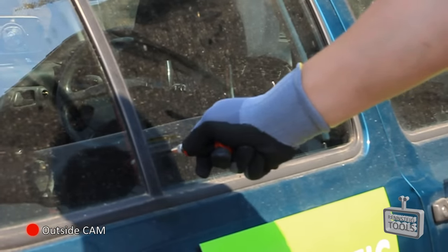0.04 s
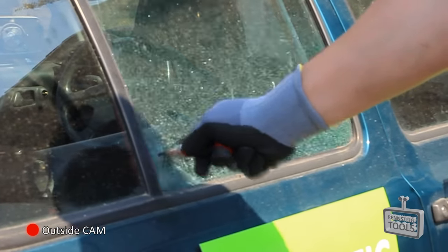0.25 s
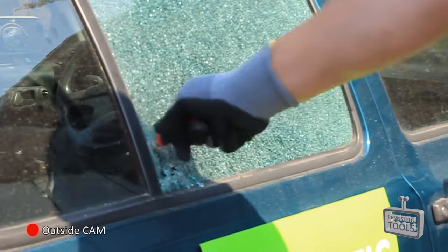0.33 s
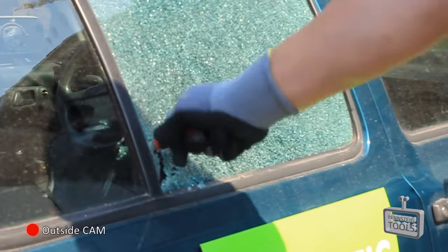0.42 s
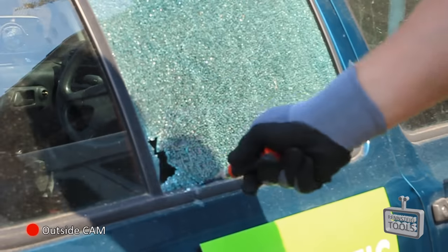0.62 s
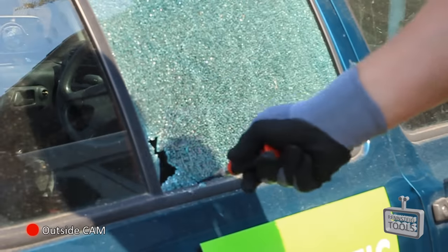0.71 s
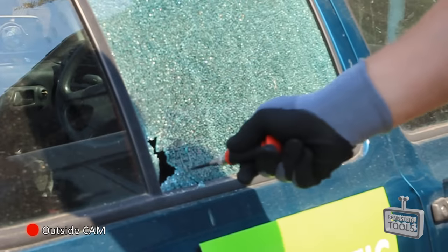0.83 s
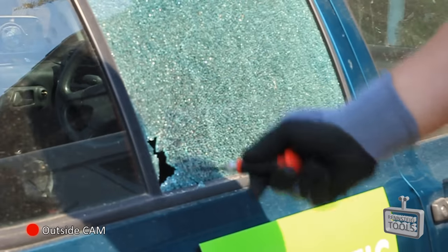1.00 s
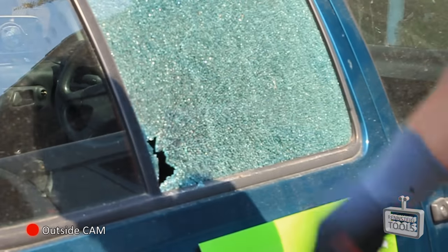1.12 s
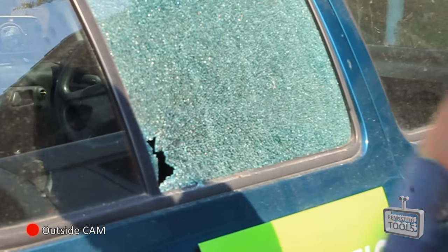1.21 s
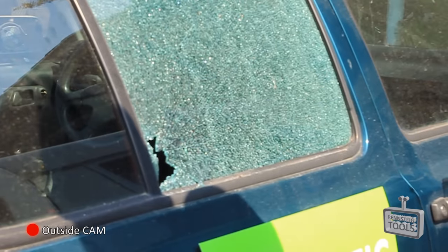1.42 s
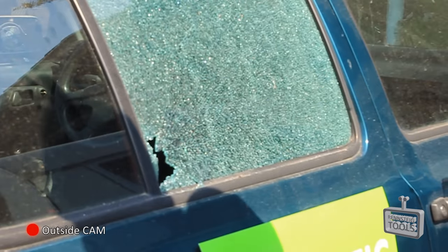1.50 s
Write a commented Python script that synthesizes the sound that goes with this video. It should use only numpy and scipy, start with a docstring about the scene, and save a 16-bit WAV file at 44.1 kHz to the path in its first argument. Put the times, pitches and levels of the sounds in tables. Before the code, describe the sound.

A car side window shatters, heard close up in quiet outdoor air. At about 0.2 seconds a punch tool gives one sharp crack with a light thump. Dense, fizzing crackle spreads through the glass, dotted with snaps, strongest from 0.3 to 0.8 seconds, then thinning. From 0.9 seconds loose pieces drop into the door with small hollow knocks and clinks, loudest around 1.2 and fading by 1.5 seconds.

```python
"""Outdoors, close to a car's side window, a spring punch is pressed against the glass and fires. The impact
gives one crack and a thump from the pane's modes. Fracture then spreads through the tempered glass as a dense
crackle that thins to single snaps. Loose pieces drop into the door and excite its brief ring, and glass edges
squeak once. The car's interior reverberates faintly over quiet outdoor air."""
import sys
import numpy as np
from scipy import signal
from scipy.fft import rfft, irfft, next_fast_len
from scipy.io import wavfile
from scipy.ndimage import uniform_filter1d

SR = 44100
rng = np.random.default_rng(int(sys.argv[2]) if len(sys.argv) > 2 else 0)


def transcribe(signal):
    """Save signal, clipped to [-1, 1], as a 16-bit WAV file at the path in sys.argv[1]."""
    frames = np.atleast_2d(signal).T
    limited = np.clip(frames, -1, 1)
    pcm = np.round(limited * 32767).astype(np.int16)
    wavfile.write(sys.argv[1], SR, pcm)


N = 68355

# blows of the punch: t/s, crack level/dB, thump level/dB, crack t60/s
PUNCH = [(0.2292, -4.5, -18, 0.015), (0.2294, -2, -19, 0.016), (0.2341, -14, -22, 0.0088)]
# spectrum of a snap's bright edge: f/Hz, level/dB
EDGE = [(1500, -17.5), (3500, -3), (6500, -1.5), (10000, -6.5), (15500, -5.5)]
# spectrum of its duller body: f/Hz, level/dB
BODY = [(100, -42), (250, -15), (800, -3), (2000, -0.5), (3700, -1.5), (10000, -42)]
# modes of the door: f/Hz, level/dB, t60/s
DOOR = [(450, -3, 0.06), (808, 0, 0.078), (920.4, 4.5, 0.061), (1159, 3, 0.049), (1330, 0.5, 0.07),
        (1450, -5.5, 0.11), (1774, 1, 0.065), (1916, -3, 0.1), (2182, -4, 0.095)]
SNAP_T60_S, TOP_HZ = 0.046, 15700


def punch(press_s=0.19):
    """Impact excitation: the tip grinds ever harder, fires, and sets the pane's modes ringing."""
    # spectra of the crack, the thump and the flexing pane: f/Hz, level/dB
    crack = [(200, -12), (1100, 1.5), (2000, -3.5), (4000, -6.5), (9500, -6), (16000, -11)]
    thump = [(120, -18), (225, 12), (500, -5), (850, 1), (1500, -10.5), (4000, -36)]
    flex = [(60, -24), (160, -10), (280, -3.5), (420, -11), (4000, -30.5), (6500, -54)]
    # modes of pane and steel tip: f/Hz, level/dB, t60/s
    pane_modes = [(227, -16.5, 0.078), (283, -27, 0.21), (810, -12, 0.046), (963, -17, 0.046),
                  (2240, -10.5, 0.025), (4160, -4.5, 0.015), (7110, -10, 0.016), (9480, -5, 0.014)]
    fire_s = PUNCH[0][0]
    force = curve([(press_s, 0), (fire_s, 1)])
    contact = curve([(press_s, 0), (press_s + 0.0032, 1), (fire_s, 1), (PUNCH[-1][0], 0)])
    out = noise(flex) * amp(-37 + 10.5 * force) * contact
    for s, crack_db, thump_db, t60 in PUNCH:
        add(out, s, amp(crack_db) * burst(crack, rise=0.0001, t60=t60))
        add(out, s, amp(thump_db) * burst(thump, rise=0.00034, t60=0.056))
    add(out, fire_s, amp(-28) * burst(flex, rise=0, t60=0.32))  # pane and door shudder
    add(out, fire_s, ring(pane_modes, rise=0.00066))
    return out


def crazing(dense_per_s=2600, sparse_per_s=100, spread_db=6.5, clump_db=1.8, ring_s=0.0059, ring_db=4):
    """Shot noise: tiny cracks, each with a short ring, cross the pane, growing coarser, then fewer."""
    # envelope of the crackle: t/s, level/dB
    envelope = [(.228, -88), (.24, -39.5), (.312, -38.5), (.33, -31.5), (.51, -30.5), (.7, -28),
                (.77, -35.5), (.85, -42), (.95, -41), (1.05, -52.5), (1.17, -58), (1.26, -43.5),
                (1.38, -56)]
    # spectra of early hairline cracks and of later, wider ones: f/Hz, level/dB
    fine = [(60, -27), (200, -5.5), (1000, -4.5), (2200, -2), (4500, -7), (6500, -2.5), (9500, -10.5)]
    coarse = [(100, -50), (280, -7), (650, -6.5), (1000, 0), (2000, -3), (4000, -7), (8000, -15)]
    level = amp(curve(envelope))
    rate = sparse_per_s + dense_per_s * level / level.max()
    sizes = amp(spread_db * np.minimum(rng.exponential(size=N), np.pi)) * rng.choice([-1, 1], N)
    impulses = unit((rng.random(N) < rate / SR) * sizes / np.sqrt(rate))
    ringing = unit(np.sqrt(decay(impulses ** 2, ring_s)) * rng.standard_normal(N))
    clumps = amp(clump_db * unit(uniform_filter1d(rng.standard_normal(N), size=260)))
    cracks = unit(impulses + amp(ring_db) * ringing) * level * clumps
    late = curve([(0.37, 0), (0.8, 1)])
    mix = (1 - late) * unit(coloured(cracks, fine)) + late * unit(coloured(cracks, coarse))
    return unit(mix) * np.sqrt(np.mean(level ** 2))


def snaps(tick_t60_s=0.0033):
    """Acoustic emission: a larger crack gives a tick, a bright edge and a dull pane and door response."""
    # larger cracks: t/s, edge level/dB, body level/dB
    fractures = [(0.327, -28, -36), (.341, -23, -27.5), (.361, -31, -47), (.483, -20.5, -24.5),
                 (.4912, -27, -28), (0.5434, -21.5, -33), (0.549, -20, -39), (0.5703, -20.5, -22),
                 (0.605, -23.5, -22.5), (.646, -36, -23), (0.6621, -19.5, -19), (0.668, -26.5, -18.5),
                 (.688, -22.5, -18.5), (.699, -28, -23), (0.7319, -25, -21.5), (0.7906, -22.5, -17),
                 (.797, -36, -24), (0.867, -26, -33), (0.9842, -30, -35.5), (1.0275, -40, -45),
                 (1.139, -38.5, -51), (1.301, -29, -39), (1.377, -43.5, -49.5), (1.4652, -48.5, -38)]
    # single splinters giving way: t/s, level/dB
    ticks = [(0.9128, -29), (.962, -36), (1.070, -34)]
    out = np.zeros(N)
    for s, edge_db, body_db in fractures:
        edge = burst(EDGE, rise=0.00029, t60=SNAP_T60_S)
        tick = amp(2) * burst(EDGE, rise=0, t60=tick_t60_s)
        body = burst(BODY, rise=0.0013, t60=1.17 * SNAP_T60_S)
        door = amp(-16) * ring(DOOR, rise=0)
        add(out, s, amp(edge_db) * (edge + tick) + amp(body_db) * (body + door))
    for s, db in ticks:
        add(out, s, amp(db) * burst(EDGE, rise=0, t60=2 * tick_t60_s))
    return out


def loose_pieces():
    """Struck resonator: loose glass clinks, knocks and thuds in the door; soft landings are duller. Once,
    rubbing glass edges give a bright squeak."""
    # contacts: landings of loose pieces and, at 0.97 s, a squeak of rubbing glass edges: t/s, knock level/dB,
    # clink level/dB, thud level/dB, rise/s, t60/s, cutoff f/Hz
    contacts = [(0.9124, -28, -48, -45, 0.0014, 0.25, 6000), (0.97, -33.5, -19, -47, .0012, 0.066, 7500),
                (1.101, -20.5, -38, -41.5, 0.0027, 0.047, 1270),
                (1.184, -12.5, -19, -24.5, 0.0026, 0.089, 15500),
                (1.214, -12.5, -25, -35.5, 0.0076, 0.086, 7960),
                (1.2239, -21.5, -13.5, -38, 0.00063, 0.08, 14500),
                (1.273, -8.5, -25, -43.5, 0.00066, 0.048, 15500),
                (1.381, -27.5, -54, -56, 0.014, 0.13, 2600), (1.476, -30, -48, -59.5, 0.002, 0.062, 3320)]
    # spectrum of the hollow knock: f/Hz, level/dB
    hollow = [(150, -37), (400, -10.5), (870, -0.5), (2100, -4.5), (3000, -13.5), (4200, -18.5),
              (7000, -33)]
    # low mode of the door skin: f/Hz, level/dB, t60/s
    skin_mode = [(306.3, -0.5, 0.18)]
    out = np.zeros(N)
    for s, knock_db, clink_db, thud_db, rise, t60, cutoff_hz in contacts:
        knock = amp(-3) * burst(hollow, rise, t60) + amp(-11) * ring(DOOR, rise)
        contact = burst(BODY, rise, t60=0.0073)
        clink = amp(clink_db) * burst(EDGE, rise, 0.47 * t60)
        thud = amp(thud_db) * ring(skin_mode, rise=0.0082)
        lowpass = signal.butter(2, min(cutoff_hz, TOP_HZ), fs=SR, output="sos")
        add(out, s, signal.sosfilt(lowpass, amp(knock_db) * (knock + contact) + clink + thud))
    return out


def splinters(first_per_s=1200, thin_s=0.17, fade_db_per_s=16, scatter_db=4.5, ring_s=0.00097):
    """A Poisson process of falling rate: the finest splits fizz after the blow, then thin to ticks."""
    # spectrum of the fizz: f/Hz, level/dB
    fizz = [(3000, -51), (7000, -8), (13000, 1.5)]
    age = np.arange(N) / SR - PUNCH[0][0]
    rate = (10 + first_per_s * np.exp(-np.abs(age) / thin_s)) * (age > 0)
    splits = rng.random(N) < rate / SR
    sizes = amp(-25 - fade_db_per_s * age + scatter_db * rng.standard_normal(N))
    crowding = np.sqrt(1 + rate * SNAP_T60_S)  # dense splits are each weaker
    energy = decay(splits * sizes ** 2 / crowding, ring_s)
    return np.sqrt(energy) * noise(fizz)


def cabin(x):
    """Reverberation: the car's interior responds with a diffuse tail whose treble dies first."""
    # reverberation times: f/Hz, t60/s
    reverb_times = [(1200, 0.31), (5000, 0.1), (14000, 0.03)]
    hz, t, spectra = signal.stft(rng.standard_normal(SR // 2), SR, nperseg=256)
    fade = amp(-60 * t / along(reverb_times, hz)[:, None])
    tail = signal.istft(spectra * fade, SR, nperseg=256)[1]
    return signal.fftconvolve(x, tail / np.sqrt(np.sum(tail ** 2)))[:N]


def outdoor_air():
    """Ambient noise: a faint, dark hiss that sinks to a steady floor."""
    # spectrum of the background: f/Hz, level/dB
    spectrum = [(80, -5.5), (1100, -6), (3000, -19), (8000, -26.5)]
    # its envelope: t/s, level/dB
    envelope = [(.2, -50), (.5, -58)]
    return amp(curve(envelope)) * noise(spectrum)


def amp(db):
    """Decibels to gain."""
    return 10 ** (np.asarray(db) / 20)


def unit(x):
    """Scale to rms 1."""
    return x / np.sqrt(np.mean(x ** 2) + 1e-20)


def along(points, hz):
    """Interpolate (f/Hz, value) points on a log frequency axis."""
    f, v = np.transpose(points)
    return np.interp(np.log(hz + 1), np.log(f + 1), v)


def curve(rows):
    """Interpolate (t/s, value) points at every sample."""
    return np.interp(np.arange(N) / SR, *np.transpose(rows))


def decay(power, tau_s):
    """Leaky integration: stored energy dies exponentially."""
    return signal.lfilter([1], [1, -np.exp(-1 / (tau_s * SR))], power)


def coloured(x, spectrum):
    """Minimum-phase filter of the given (f/Hz, level/dB) shape."""
    m = 2 * next_fast_len(N)
    gain = amp(along(spectrum, np.fft.rfftfreq(m, 1 / SR)))
    cepstrum = irfft(np.log(gain + 1e-6), m)
    cepstrum[1:m // 2] *= 2
    cepstrum[m // 2 + 1:] = 0
    return irfft(rfft(x, m) * np.exp(rfft(cepstrum)), m)[:N]


def noise(spectrum, size=N):
    """Random-phase coloured noise of rms 1."""
    gain = amp(along(spectrum, np.fft.rfftfreq(size, 1 / SR)))
    return unit(irfft(gain * np.exp(2j * np.pi * rng.random(len(gain))), size))


def burst(spectrum, rise, t60, size=8192):
    """Modal overlap: a dense ring, treated as noise that swells and dies."""
    t = np.arange(size) / SR
    shape = (1 - np.exp(-t / max(rise, 1e-5))) * amp(-60 * t / max(t60, 1e-3))
    x = noise(spectrum, size) * shape
    return x * np.sqrt(np.sum(shape ** 2) / np.sum(x ** 2))


def ring(modes, rise, scatter_db=2, size=8192):
    """Free vibration: damped modes, struck a little differently each time."""
    t = np.arange(size) / SR
    hz, db, t60 = np.transpose(modes)[:, :, None]
    level = db + scatter_db * rng.standard_normal(hz.shape)
    sines = np.sin(2 * np.pi * (hz * t + rng.random(hz.shape)))
    onset = 1 - np.exp(-t / max(rise, 1e-5))
    return (amp(level - 60 * t / t60) * sines).sum(0) * onset


def add(track, s, x):
    """Mix x into the track at time s."""
    i = int(round(s * SR))
    track[i:i + len(x)] += x[:N - i]


def scene():
    """Superposition of the breaking pane, its debris, the cabin's response and the outdoor air."""
    blow = punch()
    highpass = signal.butter(4, 170, "high", fs=SR, output="sos")  # small pieces radiate no bass
    debris = signal.sosfilt(highpass, snaps() + loose_pieces())
    reverb = cabin(amp(-37) * blow + amp(-20) * debris)
    return (blow + debris + crazing() + splinters() + reverb + outdoor_air())[None]


def record(dry, rolloff_hz=1100):
    """Overload and band limiting: the crack saturates softly, and the highest treble is cut off."""
    saturated = dry / (1 + np.abs(dry) ** 6) ** (1 / 6)
    m = next_fast_len(N + SR // 2)
    beyond = np.clip((np.fft.rfftfreq(m, 1 / SR) - TOP_HZ) / rolloff_hz, 0, 1)
    return irfft(rfft(saturated, m) * np.cos(beyond * np.pi / 2) ** 4, m)[..., :N]


dry = scene()
out = record(dry)
transcribe(out)
```